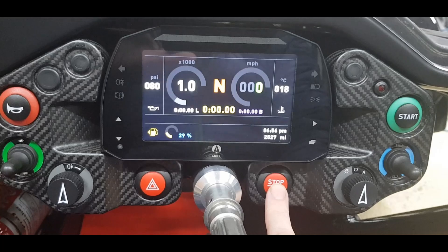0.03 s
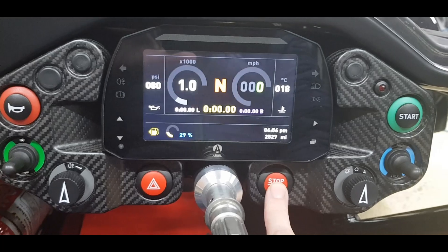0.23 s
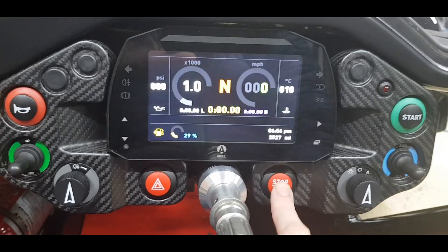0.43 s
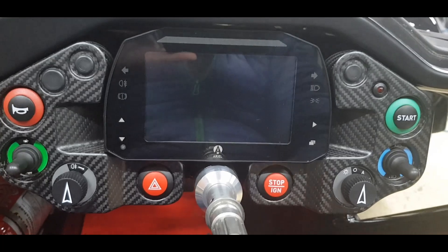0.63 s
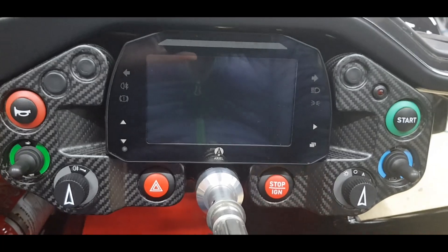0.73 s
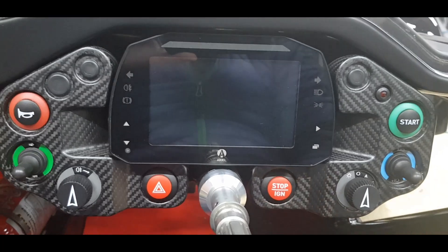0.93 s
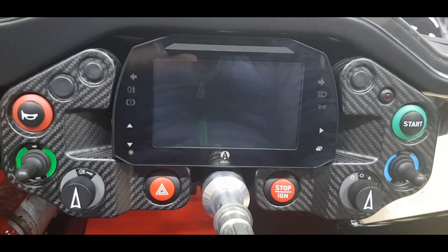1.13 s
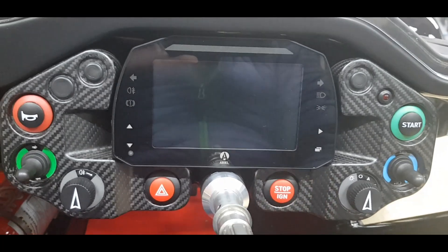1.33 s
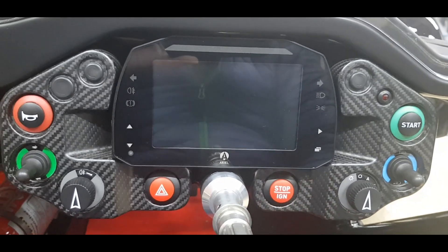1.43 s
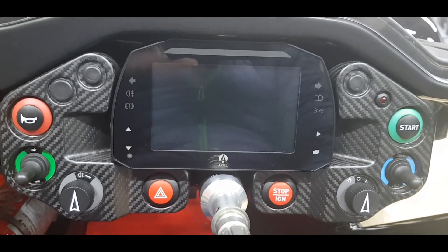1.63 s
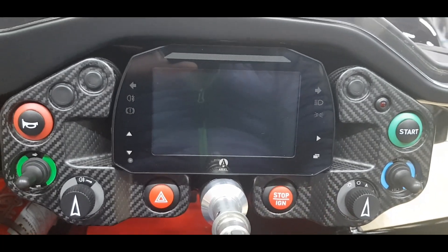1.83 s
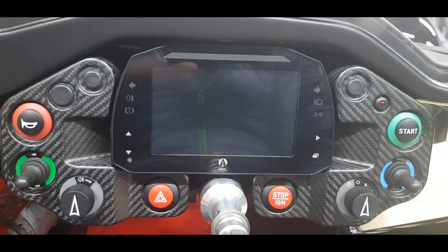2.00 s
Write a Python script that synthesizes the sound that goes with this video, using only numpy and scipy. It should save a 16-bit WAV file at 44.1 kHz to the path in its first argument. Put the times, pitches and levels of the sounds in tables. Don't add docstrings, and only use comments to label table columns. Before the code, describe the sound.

Four-cylinder car engine idling roughly, then cut, its low note sagging through soft knocks into quiet.

```python
import sys
import numpy as np
from scipy import signal
from scipy.fft import rfft, irfft, next_fast_len
from scipy.io import wavfile
from scipy.ndimage import uniform_filter1d

SR = 44100
rng = np.random.default_rng(int(sys.argv[2]) if len(sys.argv) > 2 else 0)


def boost_factor(decibels):
    exponent = np.asarray(decibels, float) / 20
    return 10 ** exponent


def put_to_file(sound):
    columns = np.atleast_2d(sound).T
    safe = np.clip(columns, -1, 1)
    whole_steps = np.round(safe * 32767)
    wavfile.write(sys.argv[1], SR, whole_steps.astype(np.int16))


N = 91022
T = np.arange(N) / SR
HZ, FRAMES = np.fft.rfftfreq(1024, 1 / SR), N // 256 + 5

BEAT_HZ, BEAT_AT_S = 33.05, .2495
CUT_S, SHUT_S = .535, .582
CHANGE_S = 1.516


def evened(x):
    return x / np.sqrt(np.mean(x ** 2) + 1e-20)


def read(points, hz):
    f, value = np.transpose(points)
    return np.interp(np.log(hz + 1), np.log(f + 1), value)


def drift(hz):
    t = T[::32]
    wander = sum(np.sin(2 * np.pi * (f * t + rng.random())) for f in np.geomspace(hz / 10, hz, 12))
    return evened(np.interp(T, t, wander))


def resonate(x, hz, width):
    turn = np.exp(2j * np.pi * np.cumsum(hz * np.ones(N)) / SR)
    r = np.exp(-np.pi * width / SR)
    return 2 * (turn * signal.lfilter([1 - r], [1, -r], x / turn + 1e-18)).real


# f/Hz, likeness
LIKENESS = [(60, 0.84), (130, 0.72), (290, 0.82), (640, 0.67), (1410, 0.45), (3100, 0.69), (6820, -0.01),
            (15000, -0.03)]


def noise(shape, patchy_db):
    a, b, c, d, patches = rng.standard_normal((FRAMES, 513, 5)).T
    patches = uniform_filter1d(patches, size=10, axis=0)
    patches = evened(uniform_filter1d(patches, size=6, axis=1))
    same = np.clip(read(LIKENESS, HZ) * 1.65 - .4, 0, 1)[:, None]
    left = a + 1j * b
    right = same * left + np.sqrt(1 - same ** 2) * (c + 1j * d)
    z = np.array([left, right]) * boost_factor(read(shape, HZ)[:, None] + patchy_db * patches)
    return evened(signal.istft(z, nperseg=1024, noverlap=768)[1][:, :N])


# multiple of the firing beat, level/dB
ENGINE_ORDERS = [(0.5, -44), (1, -20), (1.5, -12), (2, -2), (2.5, -30), (3, -4.5), (3.5, -50), (4, 0.5),
                 (4.5, -87), (5, -12.5), (5.5, -37), (6, -6), (6.5, -65), (7, -28), (7.5, -63), (8, -31),
                 (8.5, -28), (9, -14.5), (9.5, -44), (10, -24.5), (10.5, -55), (11, -23.5), (11.5, -20),
                 (12, -58), (12.5, -10), (13, -36), (13.5, -65), (14, -37), (14.5, -40), (15, -61),
                 (15.5, -60), (16, -21.5),
                 (20, -31), (23, -28.5), (23.6, -31.5), (24.2, -29), (26.55, -44), (30.6, -44), (33, -43),
              (34.4, -37), (37.6, -40), (39.1, -32), (40.1, -32.5), (41.1, -39), (43.7, -43)]


def firing():
    after = np.maximum(T - CUT_S, 0)
    hunt = .008 * np.sin(np.pi * T / CUT_S)
    sag = np.cumsum(7 * np.clip(after - .04, 0, .25)) / SR
    turns = BEAT_HZ * (T - BEAT_AT_S) + hunt - sag
    exhaust_shuts = 600 * np.maximum(T - SHUT_S, 0)
    belt_eases = 6 * T + 6.5 * np.exp(-T / 0.046)
    out = np.zeros(N)
    for k, db in ENGINE_ORDERS:
        phase = k * turns - .44 - .12 * max(k - 4, 0) ** 1.4
        if k < 9.7:
            t60, uneven_db, loss = 0.25, .4, exhaust_shuts
        else:
            t60, uneven_db, loss = 1, 2.2, belt_eases
            phase = phase + .58
        if k < 4:
            phase = phase + k % 1
        level = db + uneven_db * drift(14.3) - 60 * after / t60 - loss
        out += boost_factor(level) * np.cos(2 * np.pi * phase)
    return boost_factor(-18.5) * np.sqrt(2) * out


# t/s, f/Hz, level/dB
BOOM_PATH = [(.575, 60, -17), (.62, 60, -20), (.65, 56, -17), (.7, 54, -18), (.75, 50, -18), (.8, 45, -18),
             (.9, 44, -19), (.915, 45, -21), (.948, 56, -33), (.99, 48, -26), (1.08, 47, -30),
             (1.13, 38, -36), (1.17, 43, -33), (1.26, 43.5, -30), (1.38, 42.5, -34), (1.5, 42, -43)]
# multiple of the note, level/dB
OVERTONES = [(2, -15.5), (3, -23)]


def boom():
    s, hz, db = np.transpose(BOOM_PATH)
    turns = np.cumsum(np.interp(T, s, hz)) / SR - .26
    wave = np.cos(2 * np.pi * turns)
    for k, d in OVERTONES:
        wave += (-1) ** (k + 1) * boost_factor(d + 3.5 * drift(12)) * np.cos(2 * np.pi * k * turns)
    level = np.interp(T, s, db) - 70 * np.maximum(T - s[-1] - .1, 0)
    rise = np.clip((T - s[0]) / 0.011 + 1, 0, 1)
    return np.sqrt(2) * wave * boost_factor(level) * rise


# t/s, thump level/dB, knock level/dB, body level/dB, panel level/dB
LAST_STROKES = [(.56, -30, -23.5, -29.5, -31), (.585, -25, -46, -46, -40), (.597, -28.5, -41, -53, -34.5),
                (.635, -24, -41.5, -56, -43), (.665, -22, -51, -48, -54), (.715, -29, -47, -45, -45),
                (.745, -27.5, -45, -46, -36), (.775, -27, -34, -49, -44), (.81, -24, -32, -57, -49),
                (0.859, -28, -35, -48, -51), (0.914, -31, -38, -62, -49), (0.951, -53, -38.5, -50, -47.5),
                (.965, -30, -40.5, -52, -55), (.985, -23.5, -51, -54, -49), (1.013, -32.5, -37, -56, -54),
                (1.05, -29.5, -34.5, -57, -65), (1.075, -33, -37.5, -49, -57), (1.1, -51, -40, -47, -62),
                (1.119, -38, -41, -47.5, -57), (1.15, -39.5, -45, -47, -52), (1.245, -59, -47.5, -53, -62),
                (1.3, -62, -56, -70, -75), (1.394, -61, -66, -61, -82), (1.555, -54, -57, -68, -93),
                (1.621, -62, -62, -67, -87), (1.718, -62, -59, -68, -90), (1.755, -63.5, -68, -64, -90)]
# centre t/s, length t/s, level/dB, f/Hz
PIPE_SWELLS = [(0.588, 0.041, -29, 282.2), (0.653, 0.076, -27, 279), (0.737, 0.077, -26, 284),
               (0.821, 0.045, -38.5, 271), (0.917, 0.22, -36, 271), (1.02, 0.047, -45, 270),
               (1.104, .1, -40.5, 271), (1.194, 0.12, -50, 271), (1.299, 0.16, -57.5, 268.6),
               (1.386, 0.12, -60, 277)]


def strokes():
    modes = [(105.6, 37.8), (166.8, 51), (452, 140), (764, 47)]
    out = np.zeros(N)
    for k, (hz, width) in enumerate(modes):
        hits = np.zeros(N)
        for row in LAST_STROKES:
            hits[round(row[0] * SR)] = boost_factor(row[k + 1])
        ring = resonate(resonate(hits, hz, width), hz, width)
        out += ring * 1.63 * SR / (np.pi * width)
    for s, length, db, hz in PIPE_SWELLS:
        arch = abs(np.cos(np.pi * np.clip((T - s) / (1.29 * length), -.5, .5)))
        out += np.sqrt(2) * boost_factor(db) * arch ** 1.77 * np.sin(2 * np.pi * hz * T)
    return out


# f/Hz, level/dB per Hz
VALVE_CLATTER = [(300, -55), (500, -1.5), (600, -18), (1000, -11.5), (1500, -15), (2200, -11),
                 (5000, -18.5), (15600, -21.5)]


def clatter():
    struck = rng.random((2, N)) < 500 / SR
    taps = boost_factor(4 * np.minimum(rng.exponential(1, (2, N)), 4)) * struck
    ticks = evened(np.array([resonate(c, 12400, 3000) for c in taps + 0.68 * taps[::-1]]))
    return noise(VALVE_CLATTER, patchy_db=2.5) + boost_factor(-13) * ticks


# f/Hz, width f/Hz, level/dB
PANEL_MODES = [(784, 60, -8), (1324, 103, -8), (388, 4.2, -11), (1145, 29, -12), (878, 24, -15),
               (1960, 930, -23), (3590, 110, -21)]
# t/s, level/dB
RATTLE_FLARES = [(.03, 3.7), (.105, 4.7), (.225, 4.9), (.29, 5.7), (.4, 3), (.47, 4)]


def panel_rings():
    flares = sum(d * np.exp(-((T - at) / 0.017) ** 2) for at, d in RATTLE_FLARES)
    raw = rng.standard_normal((2, N)) * boost_factor(1.5 * drift(59.74) + flares)
    drive = raw + 0.032 * raw[::-1]
    return sum(boost_factor(d) * evened(np.array([resonate(c, f, w) for c in drive])) for f, w, d in PANEL_MODES)


# f/Hz, level/dB per Hz
VALVE_AIR = [(290, -15), (500, -10), (800, -6), (1650, -12), (2300, -6.5), (4460, -18.5), (6480, -16.5),
             (15600, -25.5)]
# f/Hz, level/dB per Hz
LATER_AIR = [(180, -6.5), (500, -4.5), (709, -9), (1200, -14.5), (1900, -9.5), (2800, -14), (3300, -15),
             (3750, -10.5), (4700, -19), (6500, -13.5), (15600, -24.5)]


def wheeze():
    leaking = noise(VALVE_AIR, patchy_db=-1.0)
    settling = noise(LATER_AIR, patchy_db=1.0)
    return np.where(T < CHANGE_S, leaking, settling) * boost_factor(0.97 * drift(40.43))


# f/Hz, level/dB per Hz
ROUGH_RUMBLE = [(15, -42), (25, -6.5), (61, -9.5), (121, -5.5), (217, -19), (271, -12), (325, -19.5),
                (549, -37.5), (900, -46), (1170, -56), (1980, -120)]


def rumble(effort_db):
    idle_db = -8 * np.clip((SHUT_S - T) / 0.047, 0, 1)
    return noise(ROUGH_RUMBLE, patchy_db=3.5) * boost_factor(-26 + idle_db + 1.315 * effort_db)


# t/s, level/dB
EFFORT = [(0, -42.5), (.6, -42), (.96, -51), (1.13, -59.5), (1.38, -64), (1.6, -75.5), (1.73, -74),
          (1.82, -79), (1.919, -100), (2.06, -100)]
# t/s, level/dB, fade t/s
AIR_PUFFS = [(.585, -43.5, 0.023), (1.164, -58, 0.034), (1.256, -57, 0.035), (1.295, -54, 0.0057),
             (1.36, -71, 0.02), (1.396, -56, 0.032), (1.544, -63, 0.075), (1.75, -68.5, 0.043)]


def machinery():
    s, db = np.transpose(EFFORT)
    level = np.interp(T, s, db)
    puffs = np.zeros(N)
    for at, d, fade in AIR_PUFFS:
        puffs += boost_factor(d) * np.clip((T - at) / .005, 0, 1) * np.exp(-np.maximum(T - at, 0) / fade)
    blend = np.clip((T - 0.48) / 0.61, 0, 1)
    throb = 1 + 0.047 * np.cos(2 * np.pi * BEAT_HZ * (T - BEAT_AT_S)) * (T < CUT_S)
    rings = panel_rings()
    running = (clatter() + rings * boost_factor(-16 * np.maximum(T - .3, 0))) * throb
    coasting = wheeze() + boost_factor(-10) * rings
    hiss = np.sqrt(1 - blend) * running + np.sqrt(blend) * coasting
    return hiss * np.hypot(boost_factor(level), puffs) * boost_factor(6) + rumble(level - db[0])


# f/Hz, level/dB
FAR_HUM = [(64.6, -47.5), (134.6, -74), (193.8, -77)]
# f/Hz, level/dB per Hz
FAR_FLOOR = [(53, -41), (90, -2), (145, -11), (154, -12.5), (288, -14), (484, -27), (700, -39), (2000, -50),
             (9920, -46.5), (15600, -32)]


def far_engine():
    hum = np.zeros(N)
    for hz, db in FAR_HUM:
        hum += boost_factor(db + 0.69 * drift(2.7)) * np.sin(2 * np.pi * (hz * T + 0.14 * drift(2.91)))
    floor = boost_factor(-67.5) * noise(FAR_FLOOR, patchy_db=2)
    return np.sqrt(2) * hum * boost_factor(-6 * (T - 2.05)) + floor


# f/Hz, level/dB
MIC_RESPONSE = [(1500, 0), (3070, -3.5), (3700, 0.5), (4600, -1.5), (6600, 1), (8100, -9.5), (9300, -8),
                (12600, -4.5), (15600, -9.5)]
# f/Hz, level/dB
LEVEL_LEAN = [(60, 2.5), (150, 1.5), (200, 3.5), (380, 0), (413, -7), (540, -6.5), (650, 4), (790, -2.5),
              (2000, 4), (4000, -1)]
# f/Hz, phase/rad
PHASE_LEAD = [(60, 0), (200, -.1), (265, -.6), (300, .1), (370, -.3), (415, 0), (530, -.5), (660, 1.4),
              (790, -.3), (1150, 1)]


def scene():
    size = next_fast_len(N + 4096)
    hz = np.fft.rfftfreq(size, 1 / SR)
    near = rfft(firing() + boom() + strokes() + machinery(), size) * boost_factor(read(MIC_RESPONSE, hz))
    total = near + rfft(far_engine(), size)
    lean = read(LEVEL_LEAN, hz) / 2
    lead = np.exp(.5j * np.outer([1, -1], read(PHASE_LEAD, hz)))
    return irfft(total * boost_factor(np.array([lean, -lean])) * lead, size)[:, :N]


def low_pass(x):
    return signal.sosfilt(signal.butter(12, 15730, fs=SR, output="sos"), x)


def record(dry):
    dip = np.clip(abs(T - CHANGE_S) / 0.032, 0, 1) ** 2.2
    mix = dry * np.maximum(dip, boost_factor(-55))
    return low_pass(mix)


dry = scene()
out = record(dry)
put_to_file(out)
```